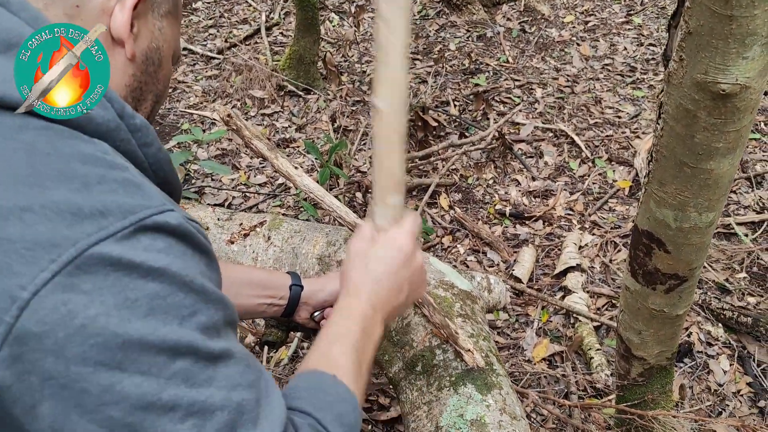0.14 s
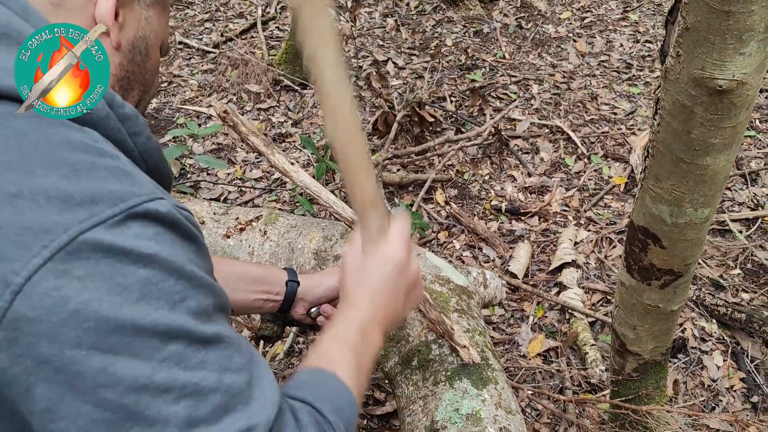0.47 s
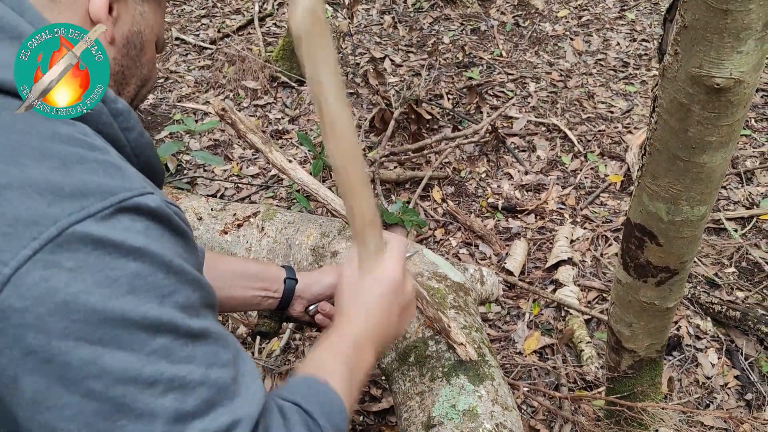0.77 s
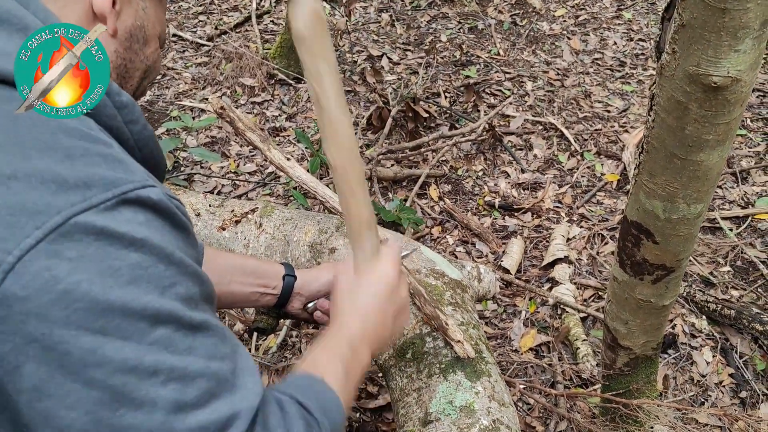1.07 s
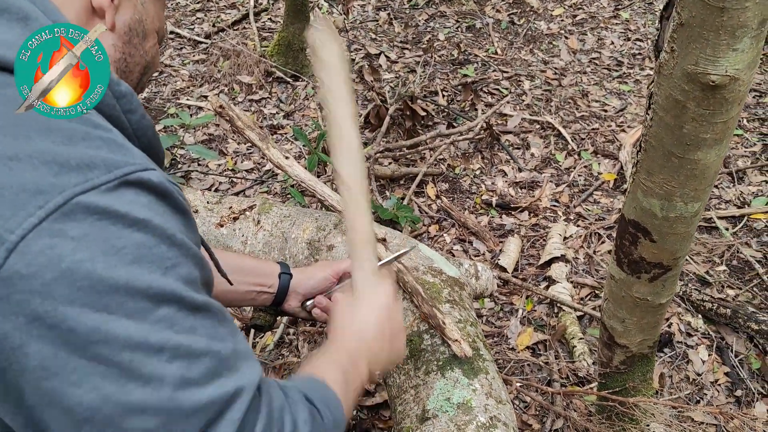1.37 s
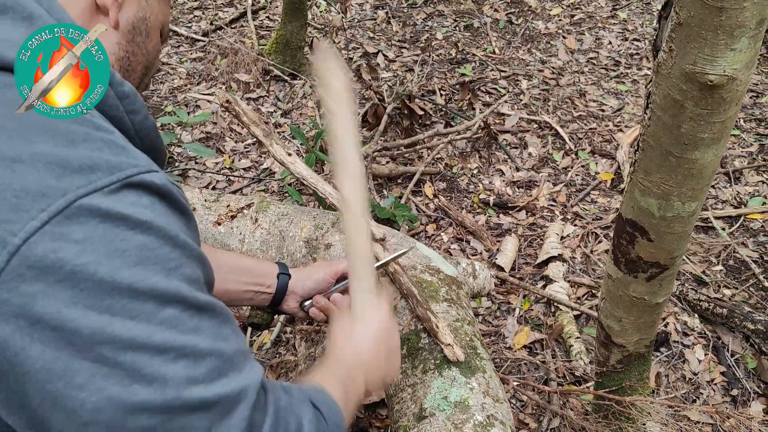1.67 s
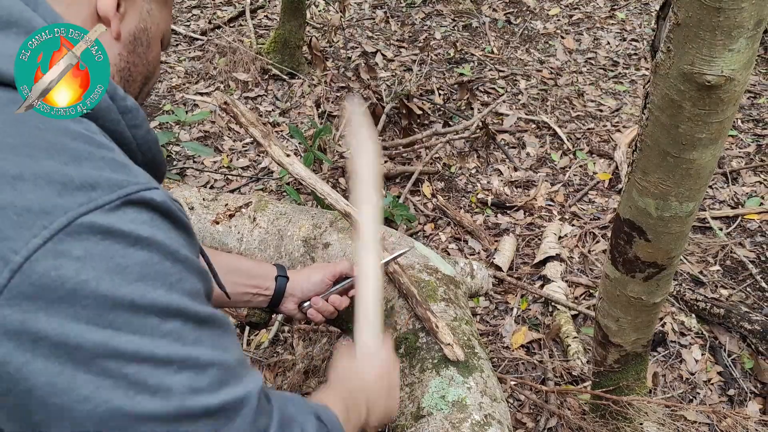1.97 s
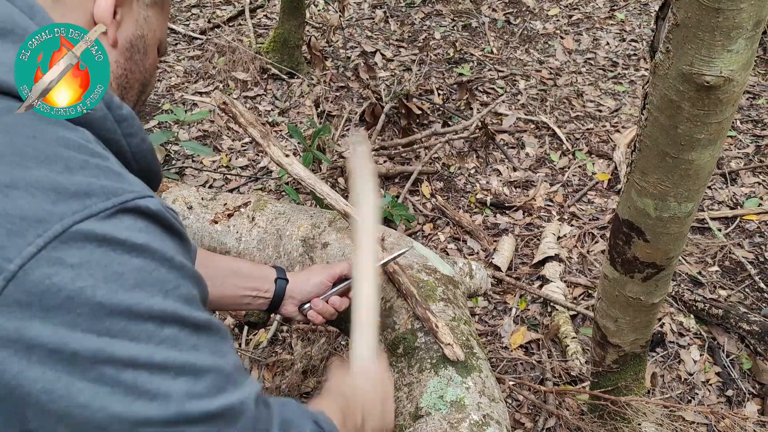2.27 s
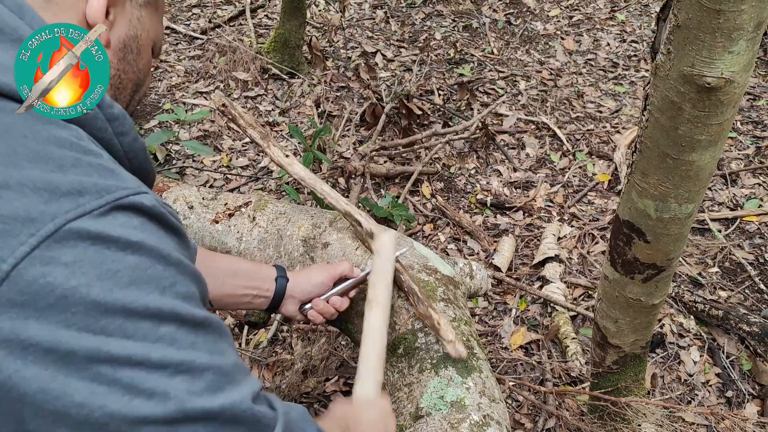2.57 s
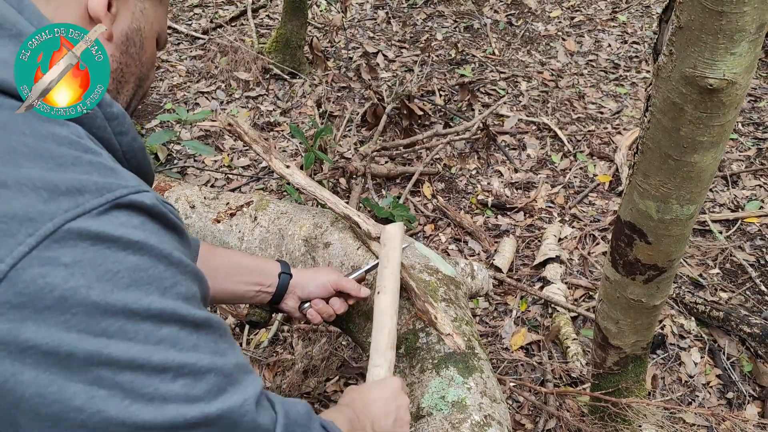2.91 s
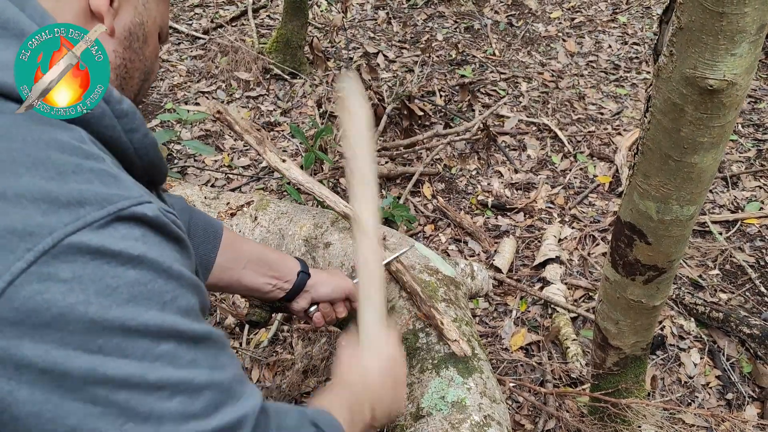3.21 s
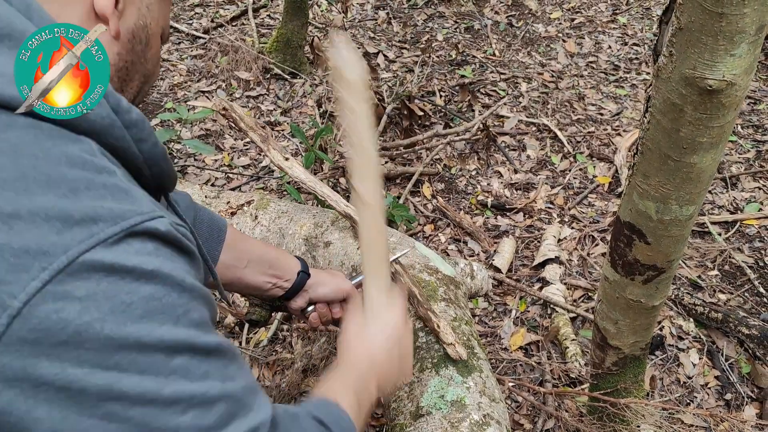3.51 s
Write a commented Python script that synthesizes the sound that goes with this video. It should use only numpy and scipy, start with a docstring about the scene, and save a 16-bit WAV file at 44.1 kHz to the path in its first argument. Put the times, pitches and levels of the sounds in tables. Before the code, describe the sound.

A stick hammers a knife in wood, heard close: hard, cracking knocks at about 0.12, 0.42, 0.71 and 1.0 seconds, continuing every 0.29 seconds to 2.74, then a duller one at 3.06 and a crisp last one at 3.4. Early blows have a bright blade ring; later ones are woodier. Soft double knocks follow about 0.04 seconds after most blows. Short diffuse tails, faint low puffs, tiny dry rustles, quiet woods.

```python
"""In a quiet wood, a wooden stick hammers the spine of a knife held across a branch on a log.
Each blow is a short chatter of contacts that excites the modes of stick, blade and branch, with a noise crack.
Double knocks sound beside many blows, and noise decaying band by band forms a tail among the trees.
Low noise swells are the air puffs of the swing; high bursts rustle over the steady noise of the woods.
A limiter holds the level down for about a tenth of a second after each peak."""
import sys
import numpy as np
from scipy import signal
from scipy.fft import rfft, irfft
from scipy.io import wavfile
from scipy.ndimage import uniform_filter1d, minimum_filter1d

SR = 44100
rng = np.random.default_rng(int(sys.argv[2]) if len(sys.argv) > 2 else 0)


def digitize_waveform(pressure):
    """Quantize a signal to 16-bit integers and store it at the path in sys.argv[1].

    Rows of a 2-D input are taken as channels; values are limited to [-1, 1].
    """
    field = np.atleast_2d(pressure).T
    bounded = np.clip(field, -1, 1)
    quanta = np.round(bounded * 32767).astype(np.int16)
    wavfile.write(sys.argv[1], SR, quanta)


N = 160965
PAD = SR // 4  # samples kept before time zero, for sounds already under way
MODE_SCATTER_DB, MODES_LOW_CUT_HZ = 2.5, 157


def from_db(db):
    """Level definition: 20 dB is a factor of ten in amplitude."""
    return 10 ** (np.asarray(db) / 20)


def peak_one(x):
    """Normalization: the largest magnitude becomes 1."""
    return x / np.abs(x).max()


def at_hz(points, hz):
    """Logarithmic frequency scale: interpolate a table along log f."""
    table = np.array(points)
    return np.interp(np.log(hz), np.log(table[:, 0]), table[:, 1])


def butter(x, order, hz, kind="low"):
    """Butterworth filtering: a maximally flat passband."""
    return signal.sosfilt(signal.butter(order, hz, kind, fs=SR, output="sos"), x)


def add(out, s, x):
    """Superposition: mix x in at time s; out starts PAD samples before zero."""
    i = int(s * SR) + PAD
    out[i:i + len(x)] += x[:len(out) - i]


def coloured(x, spectrum):
    """Spectral shaping: weight noise in the frequency domain; rms 1."""
    hz = np.fft.rfftfreq(len(x), 1 / SR) + 1
    y = irfft(rfft(x) * from_db(at_hz(spectrum, hz)), len(x))
    return y / y.std()


def ring(x, modes):
    """Modal superposition: x drives damped resonators, each scaled to its own height; peak 1."""
    out = 0
    for (hz, db, t60), scatter in zip(modes, rng.standard_normal(len(modes))):
        radius = from_db(-60 / (t60 * SR))
        angle = 2 * np.pi * hz / SR
        poles = [1, -2 * radius * np.cos(angle), radius * radius]
        mode = signal.lfilter([1, 0, -1], poles, x + 1e-18)
        out = out + from_db(db + MODE_SCATTER_DB * scatter) * peak_one(mode)
    return peak_one(butter(out, 2, MODES_LOW_CUT_HZ, "high"))


# Blows: t/s, peak level/dB, chatter length/s, stick note level/dB, blade level/dB, branch level/dB,
# ring t60/s, crack level/dB, upper cutoff f/Hz, tail level/dB, extra tail treble level/dB
BLOW_EVENTS = [(-.168, 17.5, 0.042, -8, -6.5, -28.5, 0.56, -13, 9000, -20, 5.5),
               (0.124, 14, 0.015, 0, -7, -15.5, 0.47, 0.5, 9000, -24, 0.5),
               (.417, 16, .013, 2, 1, -43.5, 0.37, 4.5, 9000, -19.5, -1),
               (0.706, 14.5, 0.011, -2, -5.5, -44.5, 0.36, 1.5, 9000, -23.5, 2),
               (.997, 11.5, 0.015, -2.5, -1, -24.5, 0.54, -2.5, 9000, -19, -1.5),
               (1.292, 9, 0.015, 2.5, -64, -27, 0.35, -3.5, 8000, -22, -2.5),
               (1.582, 10.5, 0.0087, 2.5, -19, -12, 0.31, 2, 8000, -25.5, -2.5),
               (1.875, 6, .014, 0.5, -25, -10.5, 0.39, -2.5, 8000, -25, -3),
               (2.163, 10.5, 0.011, 2, -47.5, -6, 0.38, -1, 8000, -23.5, -1.5),
               (2.457, 18, .013, -21.5, -14.5, -4, 0.31, -4.5, 9000, -20, 6),
               (2.744, 13, 0.0097, 5.5, -20, -7, 0.28, -2, 7000, -24.5, -4.5),
               (3.056, 9.5, 0.0051, 1.5, -43, -40.5, 0.113, -14.5, 2040, -48.5, 4),
               (3.405, 14, 0.0098, 3.5, -6.5, -21, 0.3, -10.5, 8000, -18.5, -3.5)]
# Modes of stick, branch and log: f/Hz, mean level/dB, t60/s
WOOD_MODES = [(248.2, -6, 0.057), (328, -7, .04), (498, -3.5, 0.048), (653, -3, 0.021), (937, -17.5, .03),
              (1235, -8.5, 0.026), (1350, -5, 0.02), (1610, 0.5, 0.01), (2006, 1.5, 0.038),
              (2222, -2.5, 0.028), (2724, 1, 0.025), (3350, -12, 0.012), (4030, -2, 0.0067)]
# Clear note of the stick: f/Hz, mean level/dB, t60/s
STICK_NOTE_MODE = [(1096, 0, 0.024)]
# Modes of the blade: f/Hz, mean level/dB, t60/s
BLADE_MODES = [(4474, 2, 0.11), (4539, -0.5, 0.05), (4649, -8.5, 0.11), (4620, -5, 0.14), (6180, -11, .018)]
# Modes of the branch: f/Hz, mean level/dB, t60/s
BRANCH_MODES = [(2397, -1.1, 0.015), (2692, -9, 0.035)]
# Spectrum of the crack, also used for rustles: f/Hz, level/dB (per Hz)
CRACK_SPECTRUM = [(1760, -16.5), (3000, 0), (3870, 1), (4940, -10.5), (5500, -7.5), (6000, -4), (7650, -34),
                  (10400, 1.5), (14500, -13), (15000, -11.5)]
ATTACK_S, CHATTER_FALL_S = 0.0002, 0.00096
AFTER_DB, AFTER_FALL_S = -6.5, 0.015  # slower part of the force
LEAD_DB, LEAD_S = -12.5, 0.0058  # faint scrape before the blow
CONTACTS_PER_S, CONTACT_SPREAD_DB = 4000, 2
NOTE_DB, CRACK_FALL_S = 1, 0.023
RATTLE_DB, DAMPED_S = -21, 0.21  # blade and branch go on shivering until the grip stills them


def contact_force(t, length):
    """Contact mechanics: a scrape leads in, the force holds during the chatter, then falls in two stages."""
    since = np.maximum(t - length, 0)
    fall = np.exp(-since / CHATTER_FALL_S) + from_db(AFTER_DB) * np.exp(-since / AFTER_FALL_S)
    scrape = (t < 0) * from_db(LEAD_DB) * (1 + t / LEAD_S)
    return np.clip(t / ATTACK_S, 0, 1) * fall + scrape


def blows():
    """Impulsive modal excitation: random contacts ring stick, blade and branch beside a noise crack."""
    out, t = np.zeros(N + PAD), np.arange(SR // 2) / SR - LEAD_S
    for s, db, length, note_db, blade_db, branch_db, ring_t60, crack_db, top_hz, *_ in BLOW_EVENTS:
        force = contact_force(t, length)
        sizes = from_db(CONTACT_SPREAD_DB * rng.exponential(1, len(t)))
        signs = rng.choice([-1, 1], len(t))
        contacts = force * sizes * signs * (rng.random(len(t)) < CONTACTS_PER_S / SR)

        crack_noise = coloured(rng.standard_normal(len(t)), CRACK_SPECTRUM)
        crack = peak_one(force * np.exp(-t / CRACK_FALL_S) * crack_noise)

        rattle_db = RATTLE_DB - 60 * t / ring_t60 - 10 * (t / DAMPED_S) ** 6
        shiver = contacts + (t > 0) * from_db(rattle_db) * rng.standard_normal(len(t))

        blow = ring(contacts, WOOD_MODES)
        blow += from_db(NOTE_DB + note_db) * ring(contacts, STICK_NOTE_MODE)
        blow += from_db(blade_db) * ring(shiver, BLADE_MODES)
        blow += from_db(branch_db) * ring(shiver, BRANCH_MODES)
        blow = butter(blow, 2, top_hz)
        add(out, s - LEAD_S, from_db(db) * peak_one(blow + from_db(crack_db) * crack))
    return out


# Double knocks: t/s, first knock level/dB, second knock level/dB, hard edge level/dB
DOUBLE_KNOCK_EVENTS = [(0.1664, 10, 6, -23), (.454, 16, 12, -15.5), (.749, -3, -1, -31),
                       (1.0429, 5, -4.5, -1), (1.3224, 10.5, 4, -25), (1.6227, 4.5, -1, -19),
                       (1.9078, -6, -21, -6), (2.4906, 17, 13.5, -7), (2.7735, 12, 4, -7),
                       (3.051, 14, -17, -52.5), (3.4363, 15, 8, -13)]
# Modes of the knock: f/Hz, mean level/dB, t60/s
KNOCK_MODES = [(450, -9, .025), (700, -7, .018), (1000, -3, .018), (1400, -1, .015), (1750, -2, .012),
               (2100, -2, .01), (2500, -5, .009), (2950, -6, .008)]
# Modes of its hard edge: f/Hz, mean level/dB, t60/s
EDGE_MODES = [(4300, 0, .006), (4800, -2, .005)]
KNOCK_GAP_S, TOUCH_FALL_S, TOUCH_TOP_HZ = 0.0087, 0.0014, 3400


def double_knocks():
    """Paired impact: two knocks close together, each soft touch driving damped modes."""
    out, t = np.zeros(N + PAD), np.arange(SR // 4) / SR
    for s, first_db, second_db, edge_db in DOUBLE_KNOCK_EVENTS:
        for lag, db in ((0, first_db), (KNOCK_GAP_S, second_db)):
            touch = rng.standard_normal(len(t)) * np.exp(-t / TOUCH_FALL_S)
            touch = butter(touch, 4, TOUCH_TOP_HZ)
            knock = ring(touch, KNOCK_MODES) + from_db(edge_db) * ring(touch, EDGE_MODES)
            add(out, s + lag, from_db(db) * knock)
    return out


# Spectrum of the tail: f/Hz, level/dB (per Hz)
TAIL_SPECTRUM = [(18, -49.5), (30, -13.5), (113, -3), (274, -7.5), (384, -3), (978, -15), (1110, -4.5),
                 (1340, -17.5), (1440, -8.5), (2770, -10), (4540, -6.5), (7430, -14.5), (9640, -3.5),
                 (13900, -21.5), (15000, -47)]
# Decay of the tail: f/Hz, t60/s
TAIL_DECAY = [(60, 0.28), (250, 0.18), (1000, 0.26), (4000, 0.21), (12000, 0.17)]
TAIL_PATCHY_DB, TAIL_TREBLE_HZ = 4, 3500


def tails():
    """Diffuse scattering: ground and trees return noise whose power decays exponentially in each band."""
    kicks = np.full((2, N + PAD), 1e-18)  # power fed in below and above the treble edge
    for s, db, *_, tail_db, treble_db in BLOW_EVENTS:
        add(kicks[0], s, from_db([db + tail_db]) ** 2)
        add(kicks[1], s, from_db([db + tail_db + treble_db]) ** 2)
    noise = [coloured(v, TAIL_SPECTRUM) for v in rng.standard_normal((2, N + PAD))]
    out, edges = 0, np.geomspace(25, 16000, num=17)
    for k, (low, high) in enumerate(zip(edges, edges[1:])):
        band = butter(noise[k % 2], 2, [low, high], "band")
        t60 = at_hz(TAIL_DECAY, np.sqrt(low * high))
        fall = from_db(-120 / (t60 * SR))  # power ratio per sample
        power = signal.lfilter([1], [1, -fall], kicks[int(low > TAIL_TREBLE_HZ)])
        # a new random level every 500 samples
        patches = np.interp(np.arange(N + PAD) / 500, np.arange(400), rng.standard_normal(400))
        out = out + band * np.sqrt(power) * from_db(TAIL_PATCHY_DB * patches)
    return out


# Air puffs of the swing: t/s (middle), level/dB, centre f/Hz, half length/s (to 1/e)
PUFF_EVENTS = [(0.029, -40.5, 68, 0.013), (0.254, -52, 112.6, 0.045), (0.345, -57, 93.7, 0.019),
               (0.603, -34.5, 87.6, 0.038), (0.685, -51, 94.5, 0.033), (.81, -45.5, 103.7, 0.09),
               (0.897, -38.5, 93.5, 0.045), (1.148, -33, 69.5, 0.028), (1.447, -31.5, 82.6, 0.041),
               (1.755, -33.5, 87, 0.025), (2.032, -38, 105, 0.06), (2.298, -44, 100, 0.045),
               (2.401, -27.5, 108.4, 0.012), (2.606, -36, 94, 0.035), (2.698, -64.5, 150, 0.042),
               (2.974, -43.5, 100, 0.055), (3.032, -24, 110, 0.01), (3.095, -32.5, 60, .04),
               (3.131, -50, 380, .05), (3.554, -33.5, 70, 0.013), (3.628, -52.5, 91, .03)]
PUFF_TOP_HZ = 224.1  # lowest upper cutoff; higher puffs raise it


def puffs():
    """Turbulent pressure at the microphone: low noise under a Gaussian swell."""
    out = np.zeros(N + PAD)
    t = np.arange(-SR // 5, SR // 5) / SR
    for s, db, hz, half in PUFF_EVENTS:
        lump = butter(rng.standard_normal(len(t)), 1, [0.5 * hz, 1.3 * hz], "band")
        lump = butter(lump, 4, max(PUFF_TOP_HZ, 1.1 * hz))
        bell = np.exp(-(t / half) ** 2)
        puff = lump * bell
        same_energy = np.sqrt(np.sum(bell ** 2) / np.sum(puff ** 2))
        add(out, s + t[0], from_db(db) * puff * same_energy)
    return out


# Dry rustles: t/s, level/dB (before the low cut), low edge f/Hz, length/s (Gaussian fall)
RUSTLE_EVENTS = [(1.228, -43, 8540, 0.017), (1.236, -28, 7340, 0.0075), (1.249, -34.5, 8700, 0.02),
                 (1.853, -56, 4400, 0.003), (2.092, -57, 4440, 0.0084), (2.28, -42, 4550, 0.0061),
                 (2.355, -54.5, 4500, 0.0098), (2.987, -46, 8230, 0.018), (2.996, -32, 8600, 0.0031),
                 (3.023, -47, 4550, 0.018), (3.171, -55, 9500, 0.038), (3.194, -35, 3000, 0.0021),
                 (3.241, -53, 3550, 0.013), (3.257, -43, 7300, .012), (3.604, -47.5, 6300, 0.011)]


def rustles():
    """Transient broadband noise: short crisp bursts of treble, as of dry leaves."""
    out, t = np.zeros(N + PAD), np.arange(SR // 8) / SR
    for s, db, hz, length in RUSTLE_EVENTS:
        envelope = np.clip(t / 0.0019, 0, 1) * np.exp(-(t / length) ** 2)  # rise in s
        burst = coloured(rng.standard_normal(len(t)), CRACK_SPECTRUM) * envelope
        add(out, s, from_db(db) * butter(burst, 4, hz, "high"))
    return out


# Spectrum of the woods: f/Hz, level/dB (per Hz)
WOODS_SPECTRUM = [(24, -46.5), (40, -12), (200, 7), (3740, -7.5), (4030, -7.5), (7870, -18), (11700, -11.5),
                  (13900, -13), (15000, -24)]
# Slow course of the woods: t/s, level/dB
WOODS_LEVEL = [(0.0, -62), (3.08, -60.5), (3.38, -69.5), (3.65, -60.5)]


def woods():
    """Ambient noise: a fixed spectrum whose level drifts slowly."""
    level_db = np.interp(np.arange(N) / SR, *np.transpose(WOODS_LEVEL))
    return from_db(level_db) * coloured(rng.standard_normal(N), WOODS_SPECTRUM)


SIDE_HZ, SIDE_DB, SIDE_S = 6000, -11.5, 0.001


def flickering_stereo(mid):
    """Mid-side stereo: randomly modulated treble, opposite in the channels, flickers between the ears."""
    wander = uniform_filter1d(rng.standard_normal(N), size=int(SIDE_S * SR))
    flicker = butter(mid, 4, SIDE_HZ, "high") * wander / wander.std()
    side = butter(flicker, 4, SIDE_HZ, "high")
    return mid + from_db(SIDE_DB) * side * np.array([[1], [-1]])


def scene():
    """Linear superposition: all sources add before the stereo spread."""
    events = blows() + double_knocks() + tails() + puffs() + rustles()
    return flickering_stereo(events[PAD:] + woods())


CEILING_DB, CUTOFF_HZ = -1, 14700
HOLD_S, AHEAD_S, GLIDE_S = 0.092, 0.006, 0.001


def record(dry):
    """Look-ahead limiting: the lowest gain nearby is held, then quickly released; low-pass filters follow."""
    needed = np.minimum(1, from_db(CEILING_DB) / (np.abs(dry).max(axis=0) + 1e-9))
    ahead, hold = int(AHEAD_S * SR), int(HOLD_S * SR)
    half = (hold + ahead) // 2
    padded = np.r_[np.ones(hold), needed, np.ones(ahead)]
    held = minimum_filter1d(padded, size=2 * half + 1)[half:][:N]
    r = np.exp(-1 / (GLIDE_S * SR))
    gain = 1 + signal.lfilter([1 - r], [1, -r], held - 1)
    out = signal.sosfilt(signal.cheby2(10, 50, 16500, fs=SR, output="sos"), dry * gain)
    return signal.sosfilt(signal.cheby2(10, 22, CUTOFF_HZ, fs=SR, output="sos"), out)


dry = scene()
out = record(dry)
digitize_waveform(out)
```